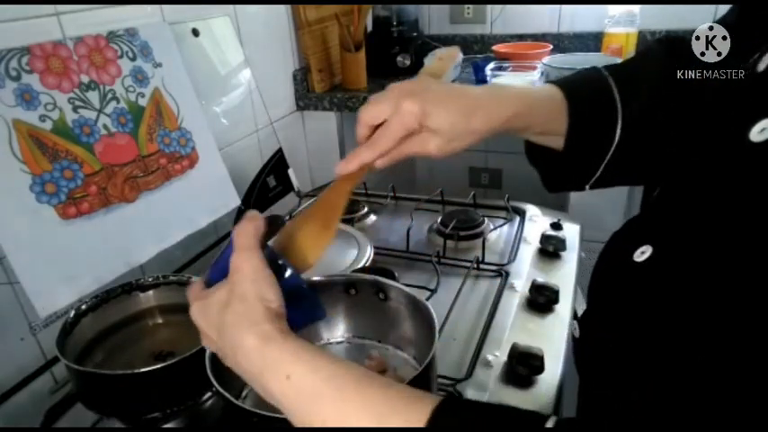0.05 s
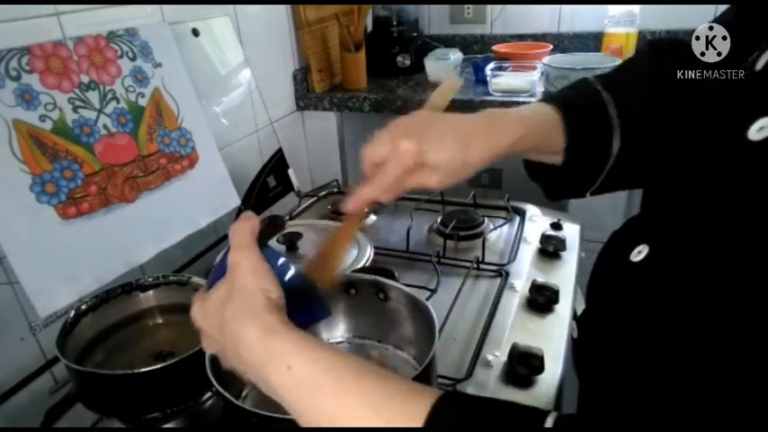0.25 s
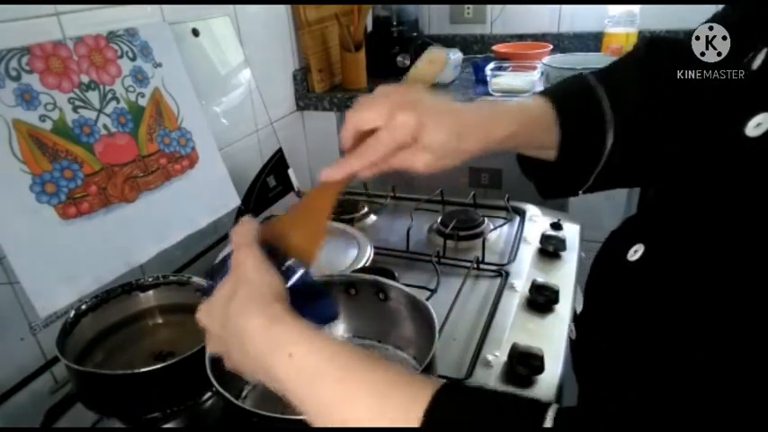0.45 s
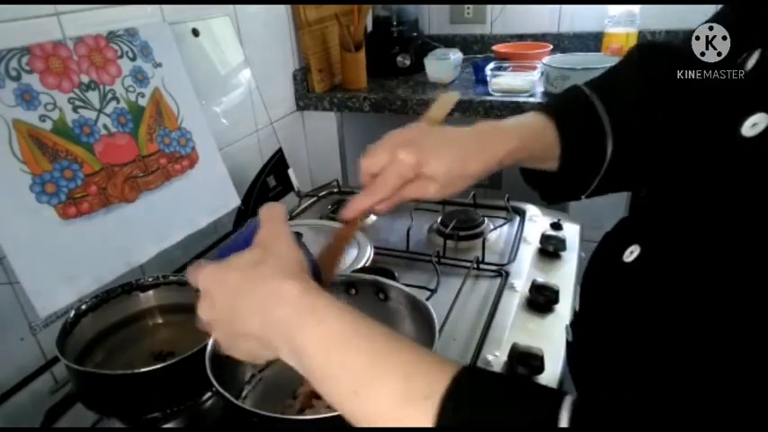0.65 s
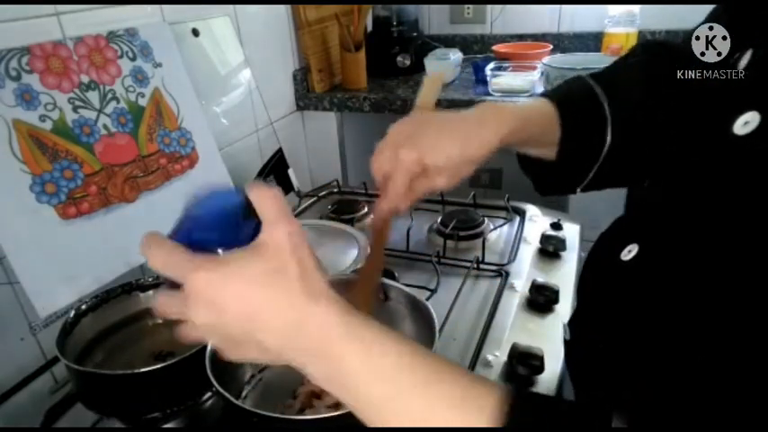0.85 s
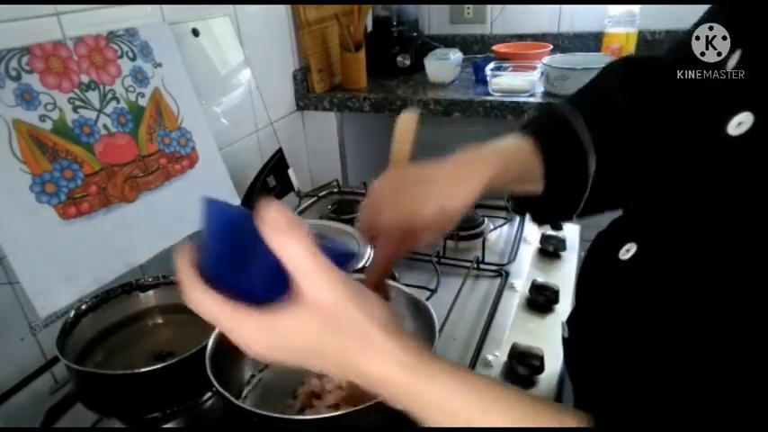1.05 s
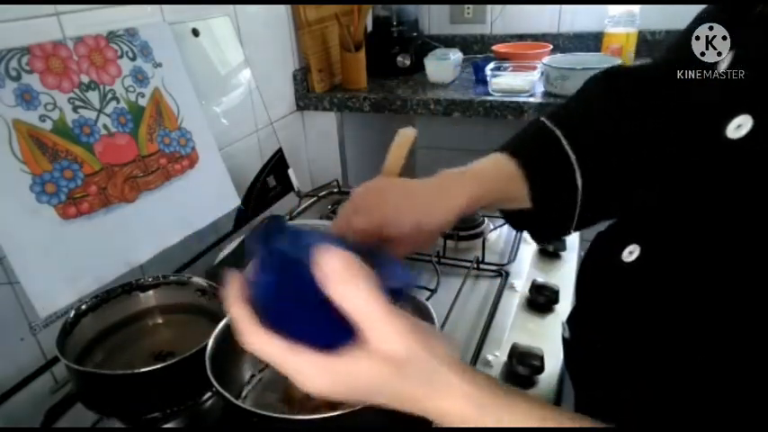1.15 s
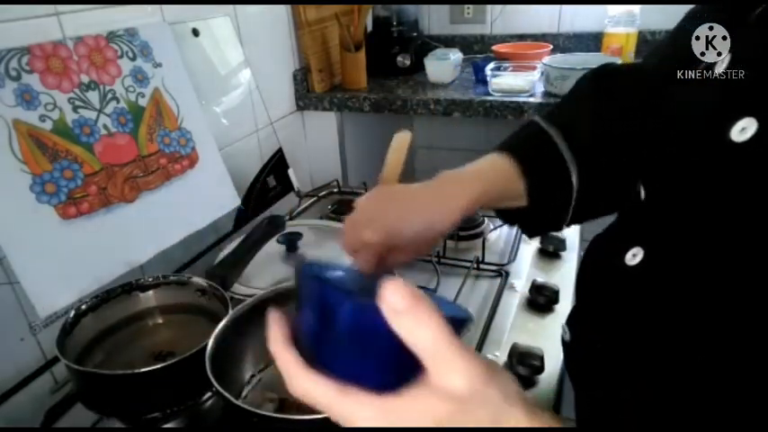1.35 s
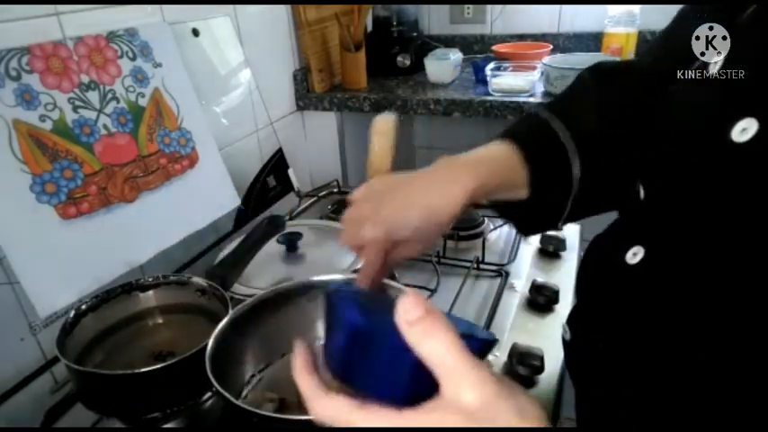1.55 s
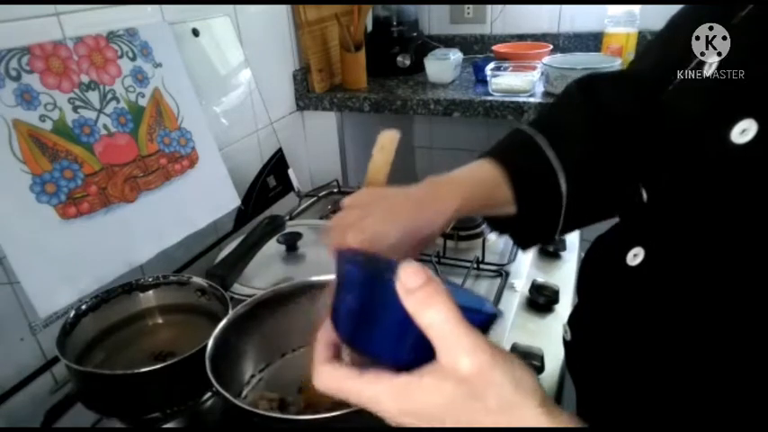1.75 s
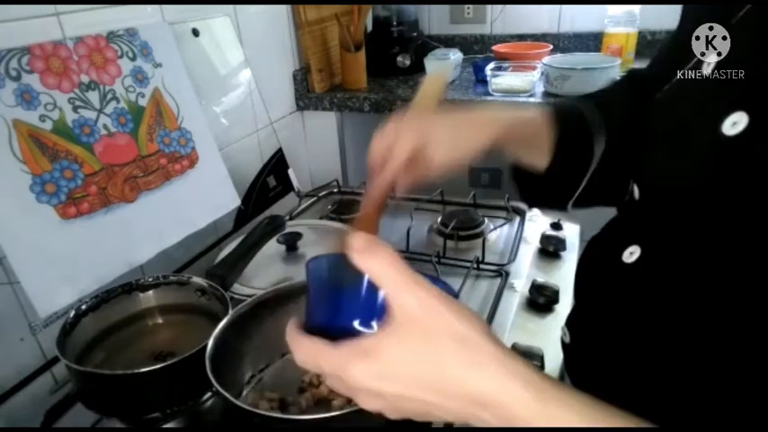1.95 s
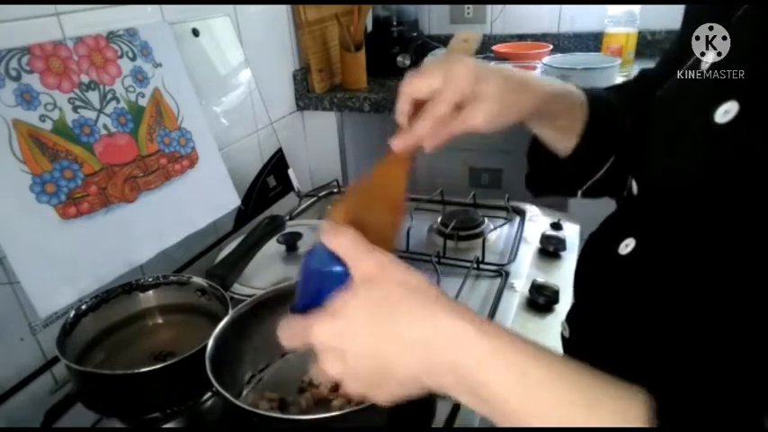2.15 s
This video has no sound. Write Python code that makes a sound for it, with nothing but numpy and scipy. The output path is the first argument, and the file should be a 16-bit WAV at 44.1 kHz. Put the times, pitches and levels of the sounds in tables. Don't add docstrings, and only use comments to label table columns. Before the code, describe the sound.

Bacon sizzles and spits in hot fat as a wooden spoon knocks and scrapes a bowl

```python
import sys
import numpy as np
from scipy import signal
from scipy.fft import rfft, irfft, next_fast_len
from scipy.io import wavfile
from scipy.ndimage import uniform_filter1d

SR = 44100
rng = np.random.default_rng(int(sys.argv[2]) if len(sys.argv) > 2 else 0)


def level_to_linear(level):
    exponent = np.asarray(level, float) / 20
    return 10 ** exponent


def wav_record(signal):
    frames = np.transpose(np.atleast_2d(signal))
    bounded = np.clip(frames, -1, 1)
    quanta = np.round(bounded * 32767).astype(np.int16)
    wavfile.write(sys.argv[1], SR, quanta)


N = 97020


def rms_one(x):
    return x / np.sqrt(np.mean(x ** 2) + 1e-20)


def at_hz(points, hz):
    table_hz, values = np.transpose(points)
    return np.interp(np.log(hz), np.log(table_hz), values)


def butter(x, order, hz, kind):
    return signal.sosfilt(signal.butter(order, hz, kind, fs=SR, output="sos"), x)


def drift(rate):
    r = np.exp(-40 * np.pi * rate / SR)
    slow = signal.lfilter([1], [1, -2 * r, r * r], rng.standard_normal(N // 20 + 2002))[2000:]
    return np.interp(np.arange(N) / 20, np.arange(len(slow)), rms_one(slow))


def ring(clicks, hz, t60):
    r, w = level_to_linear(-60 / (t60 * SR)), 2 * np.pi * hz / SR
    return signal.lfilter([0, np.sin(w)], [1, -2 * r * np.cos(w), r * r], clicks + 1e-18)


def fading(x, t60):
    return signal.lfilter([1], [1, -level_to_linear(-60 / (t60 * SR))], x)


def clicks_at(s, db):
    out = np.zeros(N)
    out[(np.asarray(s) * SR).astype(int)] = level_to_linear(db)
    return out


def grains(per_s, spread_db, channels):
    size_db = spread_db * np.minimum(rng.exponential(1, (channels, N)), 6.0)
    sizes = level_to_linear(size_db) * rng.choice([-1, 1], (channels, N))
    return rms_one(sizes * (rng.random((channels, N)) < per_s / SR))


# frequency in Hz, likeness from 0 to 1.
PORT_LIKENESS = [(60, 0.94), (400, 0.74), (1200, 0.17), (2300, -0.03), (3400, 0.51), (8000, 0.19)]
# frequency in Hz, level in dB.
PORT_LEAN = [(1000, 0.22), (4000, 1.6), (9000, 1.4), (14000, 1)]


def bands(source, spectrum, gain_db):
    out, edges = 0, 22 * 2 ** np.arange(0, 9.7, .4)
    for k, (low, high) in enumerate(zip(edges, edges[1:])):
        pair = source[2 * (k % 2):][:2]
        mid, side = butter(pair, 2, [low, high], "band")
        hz = np.sqrt(low * high)
        alike = np.clip(at_hz(PORT_LIKENESS, hz), 0, 1)
        lean_db = at_hz(PORT_LEAN, hz) * np.array([[.5], [-.5]])
        ports = np.sqrt(1 + alike) * mid + np.sqrt(1 - alike) * side * [[1], [-1]]
        out = out + level_to_linear(at_hz(spectrum, hz) + gain_db(hz) + lean_db) * ports
    return out


# frequency in Hz, density in dB per Hz.
HUM_COLOUR = [(25, -53), (50, -9), (120, 0), (250, -4), (500, -7.5), (1000, -12), (3000, -15), (14000, -68)]
HUM_DB = -52


def burner_hum():
    hum = bands(rng.standard_normal((4, N)), HUM_COLOUR, lambda hz: 2.85 * drift(3.6))
    return level_to_linear(HUM_DB) * rms_one(hum)


KITCHEN_T60_S, WALL_CUT_HZ, WET_DB = 0.52, 3350, -12


def kitchen(x):
    size = next_fast_len(N + SR)
    hz, spec = np.fft.rfftfreq(size, 1 / SR), rfft(x, size)
    lags = rng.uniform(.011, .04, (2, 10, 1))
    loss = level_to_linear(-60 * lags / KITCHEN_T60_S * (1.5 + hz / WALL_CUT_HZ))
    loop = loss * np.exp(-2j * np.pi * hz * lags)
    signs = rng.choice([-1, 1], lags.shape)
    return irfft(spec * np.sum(signs * loop / (1 - loop), axis=1), size)[:, :N]


# start in seconds, peak in dB, pitch in Hz.
GLUG_EVENTS = [(0.0772, -36, 1276), (0.161, -37, 1354), (0.1821, -30.5, 1270), (0.3538, -38, 1255),
               (0.3865, -36, 1284), (0.4382, -40.5, 1230), (0.5779, -34, 1240), (0.614, -33.5, 1270),
               (0.6574, -34.5, 1255), (0.7944, -37.5, 1235), (0.845, -32, 1267), (0.9138, -35.5, 1365),
               (0.9989, -33.5, 1290), (1.05, -31, 1276), (1.1346, -34, 1330), (1.1628, -29.5, 1260),
               (1.2519, -38, 1280), (1.3158, -39, 1240), (1.3963, -35.5, 1200), (1.4526, -40, 1295),
               (1.5494, -35, 1250), (1.6491, -37, 1220), (1.709, -62, 1280), (1.7574, -62, 1280),
               (1.8643, -33.5, 1270), (1.9044, -44, 1230), (2.0258, -40.5, 1290), (2.086, -45, 1254)]
# start in seconds, peak in dB, pitch in Hz.
TUMBLE_EVENTS = [
    (.26, -28.5, 607),
    (.289, -31, 698),
    (.314, -31.5, 607),
    (.348, -32, 619),
    (.36, -35, 608),
    (.742, -38.5, 633),
    (.752, -40, 625),
]
HOLLOW_HZ, HOLLOW_T60_S = 1277.5, 0.04
BUBBLES_PER_S, BUBBLE_DB, BUBBLE_FOLLOWS = 290, -57, 0.08


def air(x, hz):
    return ring(ring(x, hz, HOLLOW_T60_S * HOLLOW_HZ / hz), hz, 0.0042) / 30


def hollow(heat_db):
    bubble_db = BUBBLE_DB + BUBBLE_FOLLOWS * (heat_db - heat_db.mean()) + 3.0 * drift(20.0)
    small = level_to_linear(bubble_db) * grains(BUBBLES_PER_S, 3.5, channels=1)[0]
    large = sum(air(clicks_at([s], db + 0.5), hz) for s, db, hz in GLUG_EVENTS + TUMBLE_EVENTS)
    hum = air(small, HOLLOW_HZ) + 0.18 * air(small[::-1], 1.086 * HOLLOW_HZ)
    return large + 0.17 * hum


PORTS_DIFFER_DB = 4.5
PORT_LAG = 3


def struck(s, db, modes, crack_db):
    shake = rng.normal(0, 3.95, (len(s), len(modes), 1))
    shake = shake + rng.normal(0, PORTS_DIFFER_DB, (len(s), len(modes), 2))
    rings = np.zeros((2, N))
    for port in (0, 1):
        for k, (hz, level_db, t60) in enumerate(modes):
            rings[port] += ring(clicks_at(s, db + level_db + shake[:, k, port]), hz, t60)
    rings[1] = np.roll(rings[1], shift=PORT_LAG)
    both, *own = rng.standard_normal((3, N))
    crack = fading(clicks_at(s, db + crack_db), 0.029) * (0.47 * both + 0.63 * np.array(own))
    return rings + signal.lfilter([.5], [1, -.5], crack)


# start in seconds, peak in dB, pitch in Hz, weight of the crack in dB.
CLINK_EVENTS = [
    (0.2074, -13.5, 3876, -.1),
    (0.5130, -31.5, 1780, 8.5),
    (1.0787, -26.5, 3140, 6),
    (1.098, -28, 3080, 0),
]
# start in seconds, peak in dB, pitch in Hz, weight of the thud in dB.
KNOCK_EVENTS = [
    (0.2451, -9, 1230, -3.2),
    (0.5438, -23, 1000, -13),
    (0.7248, -27, 1184, -14.5),
    (1.0863, -16, 1290, -18.5),
]
# frequency in Hz, level in dB, decay t60 in seconds.
BOWL_MODES = [(918, -28, 0.2), (1494, -24, 0.13), (1780, -6, 0.039), (2120, -9.5, 0.03), (2540, -9, 0.031),
              (2914, -10, 0.055), (3154, -7.5, 0.058), (3080, -12.5, 0.035), (3876, -3, 0.039),
              (4230, -1, 0.035), (5000, -4, 0.019), (5560, -24, 0.013), (6490, -13, 0.069)]
# frequency in Hz, level in dB, decay t60 in seconds.
SPOON_MODES = [(308.6, -24, 0.14), (358, -16.5, 0.13), (470, -16, 0.037), (518, -12.5, 0.061),
               (593, -25, 0.11), (648, -18, 0.16), (740, -15.5, 0.023), (911, -2.5, 0.0087),
               (1110, -8.5, 0.021), (1990, -15, 0.18), (3420, -8, 0.033), (3830, -42, 0.033),
               (5560, -6.5, 0.026), (6050, -10, 0.022), (5380, -7, 0.018)]
KNOCK_T60_S, CRACK_DB, CLINK_DB, KNOCK_BODY_DB = 0.038, 3, -5.5, -5


def spoon():
    clink_s, clink_db, _, edge_db = np.transpose(CLINK_EVENTS)
    knock_s, knock_db, _, thud_db = np.transpose(KNOCK_EVENTS)
    clinks = struck(clink_s, clink_db + CLINK_DB, BOWL_MODES, CRACK_DB + edge_db)
    knocks = struck(knock_s, knock_db + thud_db + KNOCK_BODY_DB, SPOON_MODES, crack_db=4.5)
    notes = sum(ring(clicks_at([s], db - 8.5), hz, KNOCK_T60_S)
                for s, db, hz, _ in CLINK_EVENTS + KNOCK_EVENTS)
    return clinks + knocks + notes


# start in seconds, length in seconds, level in dB.
SCRAPE_STROKES = [
    (0.167, 0.053, -45),
    (0.225, 0.18, -42),
    (0.468, 0.0088, -46.5),
    (0.532, 0.14, -39.5),
    (0.728, 0.032, -52),
    (0.764, 0.15, -53.5),
    (1.091, 0.12, -36),
    (1.285, 0.056, -39.5),
    (1.538, 0.17, -51),
    (1.86, 0.029, -46),
]
SCRAPE_PER_S, SCRAPE_FADE_DB, SCRAPE_WOOD_DB = 1700, 14.5, -7.5


def scrape():
    t, stroke = np.arange(N) / SR, 0
    for s, length, db in SCRAPE_STROKES:
        fade = level_to_linear(db - SCRAPE_FADE_DB * np.clip((t - s) / length, 0, 1))
        start = np.clip((t - s) / 0.003, 0, 1)
        end = np.clip((s + length - t) / 0.016 + 1, 0, 1)
        stroke = stroke + fade * start * end
    clicks = grains(SCRAPE_PER_S, 3.7, channels=2) * stroke

    def body(modes):
        return rms_one(sum(level_to_linear(db) * ring(clicks, hz, .5 * t60) for hz, db, t60 in modes))

    rubbed = body(BOWL_MODES) + level_to_linear(SCRAPE_WOOD_DB) * body(SPOON_MODES)
    return rubbed * np.sqrt(np.mean(stroke ** 2))


CRACKLE_PER_S, CRACKLE_DB = 140, -7.5


def crackle(heat_db):
    puffs = fading(abs(grains(CRACKLE_PER_S, 7.0, channels=1)[0]), 0.023)
    bright = butter(puffs * rng.standard_normal((2, N)), 2, 3000.0, "high")
    return level_to_linear(heat_db + CRACKLE_DB + np.array([[2.5], [-2.5]])) * rms_one(bright)


# start in seconds, peak in dB, pitch in Hz, hold in seconds.
POP_EVENTS = [(0.0785, -17.5, 7940, 0.0059), (0.177, -23.5, 3100, 0.0069), (0.409, -31, 10400, 0.0026),
              (0.4434, -29.5, 8200, 0.0027), (0.4727, -24, 9960, 0.0038), (0.4834, -24, 3020, 0.0026),
              (0.502, -24, 4180, 0.0048), (0.5965, -20.5, 4800, 0.0037), (0.657, -33, 3230, 0.0037),
              (0.772, -31, 3270, 0.0039), (0.7936, -26, 3100, 0.0035), (0.9193, -27.5, 3350, 0.0035),
              (0.9576, -26.5, 7780, 0.0027), (1.049, -19, 5560, 0.0041), (1.1622, -16, 9700, 0.0049),
              (1.2404, -25.5, 3830, 0.0046), (1.3101, -18, 10400, 0.0028), (1.3184, -21.5, 10800, 0.006),
              (1.3515, -19.5, 11250, 0.0035), (1.3872, -21.5, 5530, 0.0031), (1.4008, -22, 5300, 0.0043),
              (1.4923, -26, 10300, 0.0062), (1.5438, -16.5, 4030, 0.0038), (1.56, -17.5, 5160, 0.0039),
              (1.5714, -20, 5350, 0.0046), (1.6255, -21, 8000, 0.0031), (1.6516, -7, 8440, 0.0016),
              (1.7453, -48, 5760, 0.0044), (1.8339, -19, 3920, 0.0024), (1.8664, -24.5, 8100, 0.0032),
              (1.92, -25.5, 5700, 0.0022), (2.0027, -25, 4100, 0.0042), (2.0466, -21.5, 3140, 0.0045),
              (2.134, -28.5, 10100, 0.0038), (2.1849, -21, 10270, 0.0052)]
POP_RING_CYCLES, POP_RING_DB, POP_DB = 18.7, -2, -5
FADE_PER_HOLD = 3
SNAP, SNAP_S = 1.64, 0.00058


def pops():
    out, t = np.zeros((2, N + 1500)), np.arange(1500) / SR
    side_db = np.array([[1.2], [-1.2]])
    for s, db, hz, hold in POP_EVENTS:
        both, *own = rng.standard_normal((3, len(t)))
        fade = level_to_linear(-60 * np.clip(t - hold, 0, 1) / (FADE_PER_HOLD * hold))
        shape = np.clip(t / 0.00037, 0, 1) * fade * (1 + SNAP * np.exp(-t / SNAP_S))
        spit = signal.lfilter([1, -1], [1, -.55], both + 0.71 * np.array(own)) * shape
        burst = spit + level_to_linear(POP_RING_DB) * ring(spit, hz, POP_RING_CYCLES / hz) * hz / 9000
        i = int(s * SR)
        out[:, i:i + len(t)] += level_to_linear(db + POP_DB + side_db) * burst / abs(burst).max()
    return out[:, :N]


# frequency in Hz, density in dB per Hz.
FIZZ_COLOUR = [(200, -0.5), (900, -17.5), (2000, -6.5), (3900, -1.5), (6500, 0), (8000, 2), (11000, 0),
               (14000, -2.5)]
FIZZ_PER_S, GRAIN_SPREAD_DB, SPUTTER_DB, PATCH_DB, FIZZ_DB = 9000, -0.5, 1, 2.5, 6
LOW_FOLLOWS = 0.1


def fizz(heat_db):
    swing = heat_db - heat_db.mean()
    sputter = SPUTTER_DB * (drift(60.0) + 0.41 * drift(16.0))

    def gain_db(hz):
        follows = np.interp(np.log(hz), np.log([800, 5000]), [LOW_FOLLOWS, 1])
        return follows * (swing + sputter) + PATCH_DB * drift(27.0)

    out = bands(grains(FIZZ_PER_S, GRAIN_SPREAD_DB, channels=4), FIZZ_COLOUR, gain_db)
    even = rms_one(out / level_to_linear(swing))
    vigour = rms_one(level_to_linear(swing))
    return level_to_linear(heat_db.mean() + FIZZ_DB) * even * vigour / vigour.mean()


# time in seconds, level in dB.
FRYING_HEAT = [(0, -51), (.1, -49), (.3, -51), (.39, -60.5), (.47, -50.5), (.7, -53), (.9, -52.5),
               (1.038, -49.5), (1.06, -43.5), (1.17, -39), (1.25, -45), (1.32, -38.5), (1.46, -48),
               (1.55, -39), (1.64, -44.5), (1.8, -45), (2.0, -45), (2.2, -49.5)]
RADIATES_HZ = 301


def scene():
    heat_db = np.interp(np.arange(N) / SR, *np.transpose(FRYING_HEAT))
    hits = butter(spoon() + hollow(heat_db) + scrape(), 3, RADIATES_HZ, "high")
    spits = pops()
    frying = spits + fizz(heat_db) + crackle(heat_db)
    room = level_to_linear(WET_DB) * kitchen(hits[0] + .4 * spits[0])
    return burner_hum() + room + hits + frying


def low_pass(x):
    return signal.sosfilt(signal.butter(12, 16390, fs=SR, output="sos"), x)


# frequency in Hz, strength from 0 to 1.
WIDEN_STRENGTH = [(60, 0.52), (500, 0.74), (2300, 0.91), (3400, 0.44), (4500, 0.53), (5600, 0.63),
                  (7000, 0.27), (11000, 0.18), (13400, 0)]
WIDEN_S, CUTOFF_HZ, MIC_LOW_HZ = .000446, 14300, 94
TOP_LEAK_DB, LEAK_FULL_DB = -9, -17


def record(dry):
    size = next_fast_len(N + 1000)
    hz = np.fft.rfftfreq(size, 1 / SR)
    late = np.clip(at_hz(WIDEN_STRENGTH, hz + 1), 0, 1) * np.exp(-2j * np.pi * hz * WIDEN_S)
    wide = dry - irfft(rfft(dry[::-1], size) * late, size)[:, :N]
    loudness = uniform_filter1d(abs(wide), size=100)
    opening = np.clip(loudness / level_to_linear(LEAK_FULL_DB), 0, 1) ** 2
    leak = level_to_linear(TOP_LEAK_DB) * opening * butter(wide, 3, [CUTOFF_HZ, 15600.0], "band")
    top_cut = signal.cheby2(14, 50, CUTOFF_HZ * 1.02, fs=SR, output="sos")
    mix = butter(leak + signal.sosfilt(top_cut, wide), 1, MIC_LOW_HZ, "high")
    return low_pass(mix)


dry = scene()
out = record(dry)
wav_record(out)
```